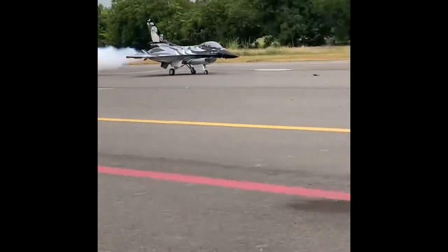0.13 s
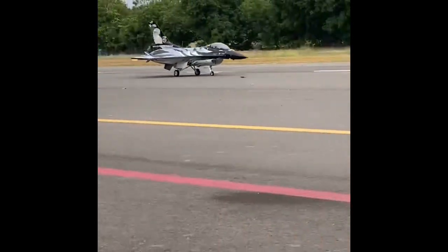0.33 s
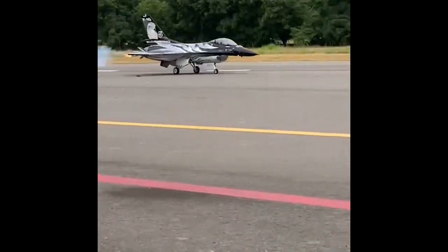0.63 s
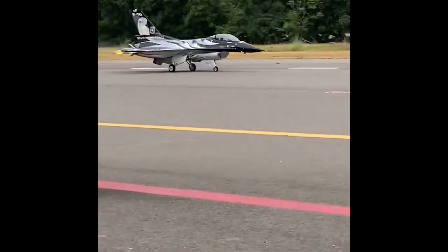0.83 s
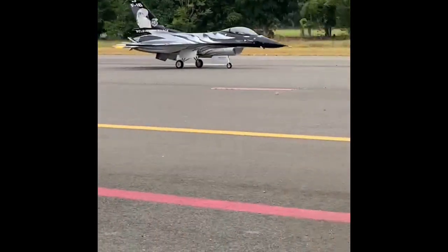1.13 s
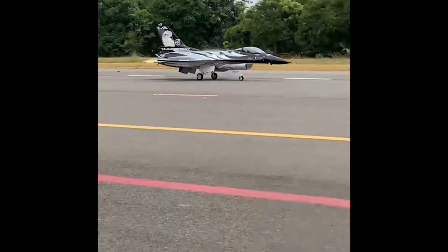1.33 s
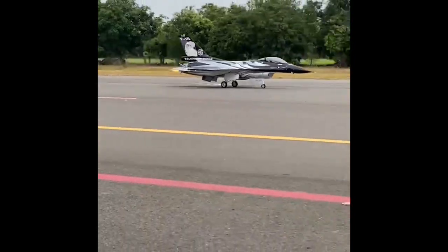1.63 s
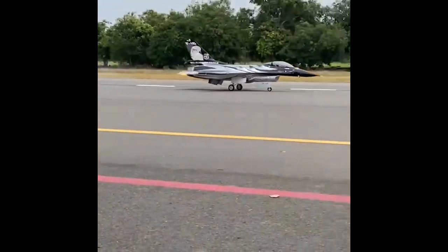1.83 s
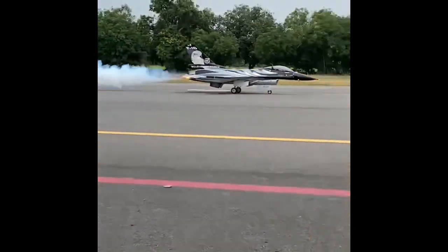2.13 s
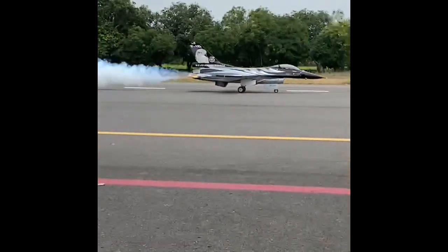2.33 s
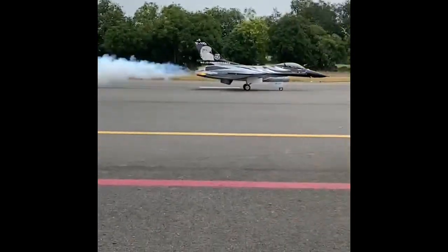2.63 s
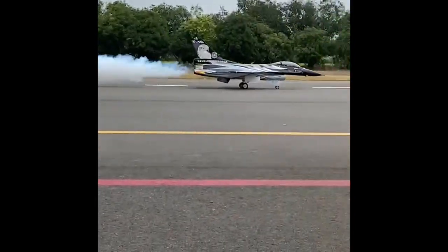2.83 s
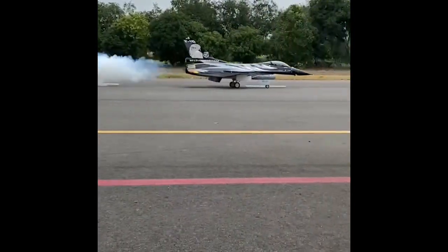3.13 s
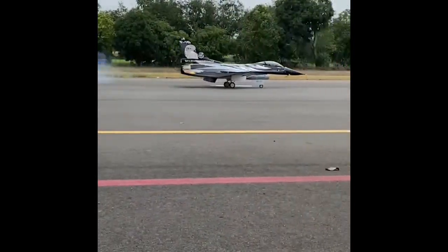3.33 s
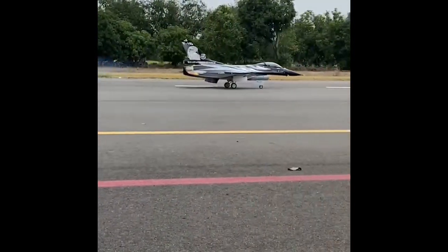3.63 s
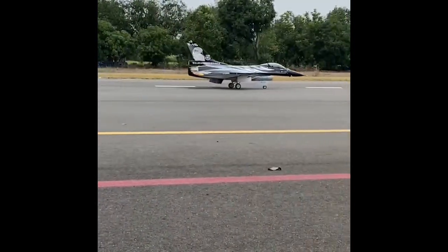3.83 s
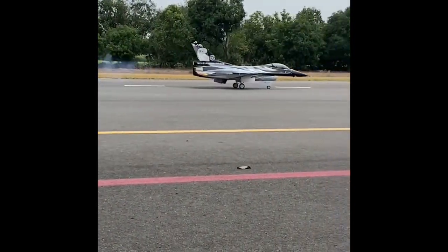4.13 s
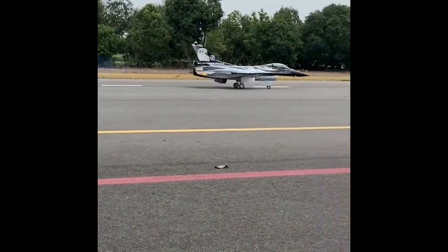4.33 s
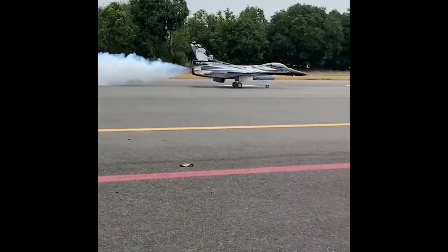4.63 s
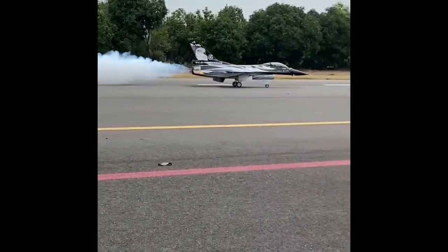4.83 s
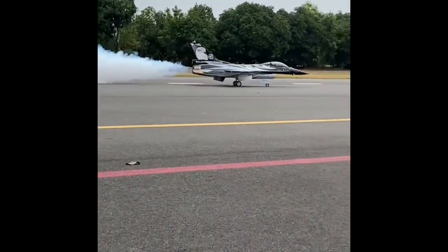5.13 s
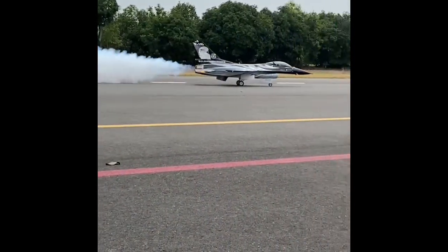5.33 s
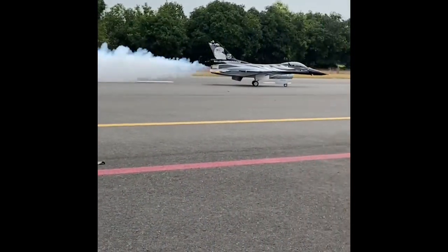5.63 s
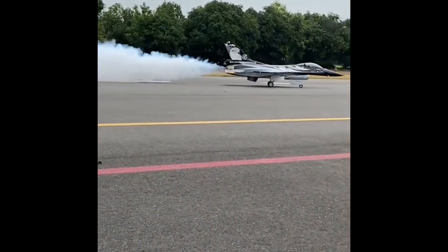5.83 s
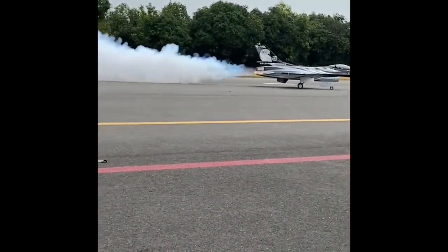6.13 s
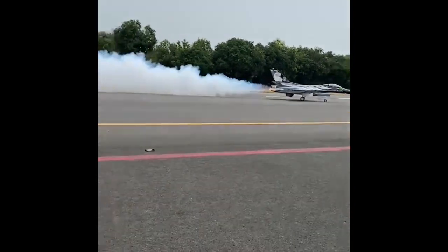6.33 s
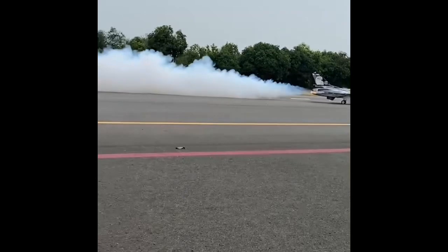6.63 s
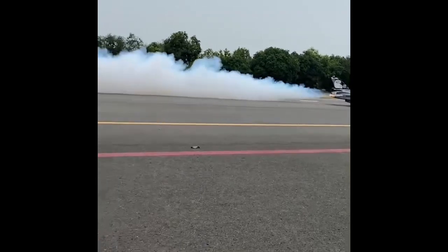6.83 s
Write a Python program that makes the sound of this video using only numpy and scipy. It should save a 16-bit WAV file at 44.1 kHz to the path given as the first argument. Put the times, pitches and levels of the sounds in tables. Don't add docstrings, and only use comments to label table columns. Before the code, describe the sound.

Shrill compressor whine wavers and drops out in quick fades while a miniature jet's tailpipe rumbles, swells and roars across an airfield runway.

```python
import sys
import numpy as np
from scipy import signal
from scipy.fft import rfft, irfft, next_fast_len
from scipy.io import wavfile
from scipy.ndimage import uniform_filter1d, map_coordinates

SR = 44100
rng = np.random.default_rng(int(sys.argv[2]) if len(sys.argv) > 2 else 0)


def volts_from_decibels(level):
    exponent = np.asarray(level, float) / 20
    return 10 ** exponent


def dump_mix(stems):
    frames = np.atleast_2d(stems).T
    limited = np.clip(frames, -1, 1)
    pcm = np.round(limited * 32767).astype(np.int16)
    wavfile.write(sys.argv[1], SR, pcm)


N = 308259


def along(points, hz):
    f, v = np.transpose(points)
    return np.interp(np.log(hz + 1), np.log(f + 1), v)


def curves(rows, t):
    s, *cols = np.transpose(rows)
    return [np.interp(t, s, c) for c in cols]


def unit(x):
    return x / np.sqrt(np.mean(np.abs(x) ** 2) + 1e-20)


def wobble(rate):
    return map_coordinates(rng.standard_normal(N // 100), [np.arange(N) * rate / SR])


def patches(shape, tall, long):
    field = uniform_filter1d(rng.standard_normal(shape), tall, 0)
    return unit(uniform_filter1d(field, long, 1))


def rush(colour, patchy_db, streak_db):
    hz, s, z = signal.stft(rng.standard_normal((2, N)), SR, nperseg=2048)
    gain = colour(hz[:, None], s) * np.ones(len(s))
    gain = gain / np.sqrt(np.mean(gain ** 2, axis=0))
    eddies = patchy_db * patches(gain.shape, tall=16, long=3)
    streaks = streak_db * patches(gain.shape, tall=3, long=35)
    return unit(signal.istft(z * gain * volts_from_decibels(eddies + streaks), SR, nperseg=2048)[1][:, :N])


def resonance(hz, centre_hz, width_hz):
    return hz * width_hz / np.hypot(centre_hz ** 2 - hz ** 2, hz * width_hz)


def glint_db(glints, hz, s):
    total_db = 0
    for at, half_s, centre, half_hz, db in glints:
        total_db = total_db + db * np.exp(-((hz - centre) / half_hz) ** 2) * np.exp(-((s - at) / half_s) ** 2)
    return total_db


def steady(x, span_s):
    power = uniform_filter1d(x[0] ** 2, round(span_s * SR))
    return x / np.sqrt(np.abs(power) + 1e-3)


# (time [s], blade passing rate [Hz])
BLADE_RATE = [(0.0, 4994.3), (0.411, 4795.1), (0.822, 4610.2), (1.234, 4451.1), (1.645, 4381.8),
              (2.056, 4423.5), (2.467, 4501.4), (2.878, 4600.9), (3.289, 4713.4), (3.701, 4779.2),
              (4.112, 4779.9), (4.523, 4731.1), (4.934, 4645.0), (5.345, 4548.3), (5.756, 4439.1),
              (6.168, 4429.5), (6.579, 4635.6), (6.99, 4910.2)]


def spool(t):
    s, hz = np.transpose(BLADE_RATE)
    return map_coordinates(hz, [np.interp(t, s, np.arange(len(s)))], mode="nearest")


# (time [s], level [dB])
THROTTLE = [(0, -30.5), (.2, -37), (.9, -33.5), (1.15, -35), (1.56, -30.5), (1.9, -27), (2.4, -25.5),
            (2.65, -26), (3.35, -25), (4.0, -27.5), (4.35, -26.5), (4.55, -29.5), (5.05, -31), (5.2, -29),
            (5.7, -29.5), (6.27, -22.5), (6.55, -21), (6.99, -23.5)]


def thrust_db(t):
    return curves(THROTTLE, t)[0]


def extra_thrust(t):
    return thrust_db(t) + 26.5


def turned(t):
    return np.clip(t / 1.84, 0, 1)


def law(t, base, thrust, turn, rev):
    cruise_hz = 4600
    return base + thrust * extra_thrust(t) + turn * turned(t) + rev * (spool(t) - cruise_hz) / 100


def halo(rate, db):
    return 1 + volts_from_decibels(db) * (wobble(rate) + 1j * wobble(rate))


# (time [s], level [dB])
WHINE_LEVEL = [(0, -21), (.45, -18.5), (.66, -20.5), (1.0, -17.5), (1.15, -28), (1.75, -29.5), (1.9, -24),
               (2.25, -31.5), (2.53, -22.5), (2.72, -30.5), (3.3, -19.5), (3.9, -18), (4.65, -18),
               (4.85, -26.5), (5.5, -27.5), (6.3, -23), (6.56, -18.5), (6.99, -12.5)]
# (time [s], half width [s], depth [dB])
WHINE_FADES = [(0.32, 0.05, -10), (.47, .04, -5), (1.14, .025, -12), (1.243, 0.013, -14), (1.43, 0.03, -6),
               (1.55, 0.03, -8), (1.78, 0.05, -7), (2.1, 0.035, -12), (2.313, 0.011, -8),
               (2.519, 0.017, -11), (2.599, 0.042, -13), (2.805, 0.029, -12), (2.909, 0.019, -15),
               (3.027, 0.014, -17), (3.401, 0.034, -13), (3.6, .05, -6), (3.68, 0.09, -16),
               (4.163, 0.04, -21), (4.494, 0.06, -16), (4.762, 0.045, -14), (4.889, 0.035, -24),
               (5.177, 0.023, -22), (5.32, 0.02, -15), (5.51, 0.03, -10), (5.95, 0.03, -7), (6.4, .04, -6),
               (6.64, 0.07, -13), (6.694, 0.03, -11), (6.789, 0.06, -18), (6.975, 0.06, -22)]


def compressor(t):
    spin = np.exp(2j * np.pi * np.cumsum(spool(t)) / SR)
    second_db = curves(WHINE_LEVEL, t)[0]
    third_db = law(t, base=-47, thrust=0, turn=-7.5, rev=-1.1)
    third_db = third_db + 2.5 * wobble(5.7) + 7 * np.clip((t - 6.35) / 0.28, 0, 1)
    paths = 1
    for s, half_s, depth_db in WHINE_FADES:
        paths = paths * (t - s + 1j * half_s * volts_from_decibels(depth_db)) / np.hypot(t - s, half_s)
    first = volts_from_decibels(-55 - 10 * turned(t)) * halo(30, -26) * spin
    second = volts_from_decibels(second_db) * paths * (halo(40, -7.5) + halo(480, -43) - 1) * spin ** 2
    third = volts_from_decibels(third_db) * halo(49, -13) * spin ** 3
    return np.sqrt(2) * (first + second + third).real


# (frequency [Hz], level per Hz [dB])
RUMBLE_COLOUR = [(15, -75.5), (30, -44), (42, -46.5), (55, -7), (100, -7), (150, 2), (190, -4),
                 (300, -14.5), (600, -92.5)]
# (time [s], deep rumble [dB], roar [dB], low swell [dB])
EXHAUST_AIM = [(0, 0, -1, -5), (.5, -5, 1, -4), (.9, -3, 0.5, 11), (1.3, -3, 0.5, 2.5),
               (1.8, -4.5, 0.5, -6), (2.3, 0, 2, -1), (2.8, 1.5, 2, 3.5), (3.2, 1.5, 1.5, 2),
               (3.6, 2.5, 1, -16), (4.0, 0, 1, -4), (4.5, -0.5, 0.5, -9), (5.0, 0.5, 1, -5),
               (5.5, -2.5, 1.5, -2), (5.9, -0.5, 2, 3), (6.2, -4, 2, 1.5), (6.5, 1, 2.5, -3.5),
               (6.75, -1, 0, 12), (6.99, 2.5, 0, 8)]
# (time [s], overtone gain [ratio], boom width [Hz])
TAILPIPE = [
    (0, 0.66, 85),
    (1.2, 0.03, 77),
    (2.6, 1.77, 64.7),
    (3.6, 1.43, 75),
    (5, 1.2, 66.7),
    (6.1, 0.89, 97),
    (6.99, 1.1, 92.3),
]
# (time [s], half width [s], centre [Hz],
# half width [Hz], level [dB])
LOW_GLINTS = [(.5, 0.8, 173, 23, -5), (.6, .7, 334, 30, -6.5), (.7, 0.55, 281, 11, 3.5),
              (3.6, 0.77, 876, 70, -3.5), (3.1, .7, 1800, 88, -1.5), (3.1, .15, 283, 32, -1.5),
              (4.14, .15, 399, 60, -2.5), (1.38, 0.38, 365, 60, 6), (1.56, 0.3, 532, 70, -6.5),
              (3.2, 0.24, 558, 80, -6), (5.5, 0.66, 464, 50, -2), (5.7, .5, 950, 70, -2.5),
              (6.59, 0.34, 618, 50, 9.5), (6.85, 0.29, 150, 25, 1.5), (6.9, 0.22, 560, 60, 4.5),
              (5.5, 0.36, 1000, 45, 4), (6.1, 0.26, 1070, 50, 3), (.5, .6, 1110, 80, 4.5),
              (.5, .6, 1480, 60, -3), (6.7, 0.32, 810, 55, 4), (2.1, 0.27, 920, 140, 2)]


def rumble(t, surge):
    def colour(hz, s):
        opening = curves(TAILPIPE, s)[0] - 1.4 - 0.16 * np.maximum(extra_thrust(s), 0)
        lift_db = 2.6 * opening * np.log2(hz / 100 + .01)
        swell_db = curves(EXHAUST_AIM, s)[2] / (1 + (hz / 68) ** 8)
        return volts_from_decibels(along(RUMBLE_COLOUR, hz) + lift_db + swell_db + glint_db(LOW_GLINTS, hz, s))

    level_db = law(t, base=-39, thrust=0.67, turn=8.5, rev=0) + curves(EXHAUST_AIM, t)[0]
    noise = steady(rush(colour, patchy_db=-1, streak_db=1.7), span_s=.17)
    return volts_from_decibels(level_db + 0.5 + 0.25 * surge) * noise


# (time [s], tailpipe [Hz], airframe duct [Hz])
DUCT_TUNING = [(0, 256, 1392), (.9, 256, 1475), (1.25, 263.3, 828), (1.9, 237.7, 820), (2.3, 218, 837),
               (2.7, 207, 980), (3.3, 201, 940), (4.1, 212, 1020), (4.7, 197, 935), (5.2, 204, 990),
               (5.7, 201, 1013), (6.3, 201, 1090), (6.5, 203, 800), (6.99, 194, 843)]
# (time [s], half width [s], level [dB])
BOOM_SURGES = [(1.99, 0.22, 3.5), (2.07, 0.045, -9.5), (2.49, 0.069, -6), (2.63, 0.022, 7.5),
               (2.76, 0.22, 0.5), (4.48, 0.021, -9), (5.08, 0.043, -4.5), (5.94, 0.021, 5),
               (5.99, 0.066, -2.5), (6.85, 0.015, -17), (6.91, 0.065, 3)]


def boom(t, surge):
    def colour(hz, s):
        ring = resonance(hz, curves(DUCT_TUNING, s)[0], curves(TAILPIPE, s)[1])
        return ring ** 3 * volts_from_decibels(glint_db(LOW_GLINTS, hz, s))

    level_db = thrust_db(t)
    for s, half_s, db in BOOM_SURGES:
        level_db = level_db + db * np.exp(-((t - s) / half_s) ** 2)
    noise = steady(rush(colour, patchy_db=0.5, streak_db=4.5), span_s=.11)
    return volts_from_decibels(level_db + 0.1 + 0.25 * surge) * noise


# (frequency [Hz], level per Hz [dB])
ROAR_COLOUR = [(200, -64.5), (280, 3.5), (340, -6.5), (430, -1.5), (500, -8), (610, -6), (720, -7.5),
               (900, -12), (1300, -13), (1500, -15), (1800, -12.5), (2000, -16), (2300, -21.5),
               (6000, -44.5)]


def roar(t, surge):
    def colour(hz, s):
        overtone = curves(TAILPIPE, s)[0] * resonance(hz, centre_hz=367.7, width_hz=44) ** 2
        duct = 1 + 1.5 * resonance(hz, curves(DUCT_TUNING, s)[1], width_hz=90) ** 2 + overtone
        db_per_octave = law(s, base=-3.5, thrust=-0.266, turn=3.5, rev=0.55)
        tilt_db = db_per_octave * np.log2(hz / 700 + .01)
        return volts_from_decibels(along(ROAR_COLOUR, hz) + glint_db(LOW_GLINTS, hz, s) + tilt_db) * duct

    level_db = law(t, base=-38, thrust=0.535, turn=6.5, rev=0.83) + curves(EXHAUST_AIM, t)[1]
    return volts_from_decibels(level_db + 0.65 + 0.4 * surge) * rush(colour, patchy_db=.5, streak_db=2.5)


def exhaust(t):
    surge = wobble(8.3)
    return rumble(t, surge) + boom(t, surge) + roar(t, surge)


# (frequency [Hz], level per Hz [dB])
HISS_COLOUR = [(1200, -71), (2200, -1), (2800, 1.5), (4000, -1.5), (5000, 0), (5700, -1.5), (6700, 3),
               (7700, 2), (8500, 2), (10000, 4), (11500, -9), (12600, -8.5), (14500, -6.5), (15600, -23)]
# (time [s], half width [s], centre [Hz], half width [Hz], level [dB])
HISS_ECHO = [(.6, 0.38, 3430, 910, 4), (.6, 0.7, 6880, 500, 2), (.5, 0.44, 5100, 203, 7.5),
             (1.8, 0.61, 3500, 690, -5.5), (3.3, 0.52, 5160, 197, 3), (3.7, 0.94, 3770, 685, 3),
             (5.4, 0.32, 6460, 1160, -5), (6.6, 0.6, 6200, 398, 1.5), (6.3, 0.39, 4370, 150, 3),
             (6.5, 0.95, 3220, 250, -6.5), (6.75, 0.63, 5300, 250, 1.5)]


def intake(t):
    def colour(hz, s):
        db_per_octave = law(s, base=2.3, thrust=0.017, turn=-0.043, rev=0.35)
        sheen_db = law(s, base=0.96, thrust=-0.15, turn=-1.8, rev=-0.96) / (1 + (11500 / (hz + 1)) ** 12)
        tilt_db = db_per_octave * np.log2(hz / 5000 + .01)
        return volts_from_decibels(along(HISS_COLOUR, hz) + tilt_db + sheen_db + glint_db(HISS_ECHO, hz, s))

    level_db = law(t, base=-36, thrust=0.4, turn=-3.5, rev=0.42) + 4.5 + 0.21 * wobble(11)
    return volts_from_decibels(level_db) * rush(colour, patchy_db=1.35, streak_db=2.5)


# time [s], peak [dB], pitch [Hz], decay by 60 dB [s]
SEAM_BUMP = (1.013, -17, 130, .055)


def wheel(t):
    at, peak_db, hz, t60 = SEAM_BUMP
    u = np.maximum(t - at, 0)
    decay = volts_from_decibels(peak_db - 60 * u / t60)
    onset = 1 - np.exp(-u / 0.0042)
    return 1.6 * decay * onset * np.sin(2 * np.pi * hz * u)


# (frequency [Hz], phase [rad])
PORT_LEAD = [(1900, 0), (2650, .65), (3600, .08), (4300, .5), (4700, 1.4), (5050, 2.7), (5350, 1.6),
             (5700, 1.45), (7000, 2.45), (8800, 2.86), (9550, 3.075), (10000, 3.28), (13250, 4.26),
             (15000, 5.05)]
# (frequency [Hz], level [dB])
PORT_TILT = [(60, 0.0), (99, 0.0), (160, 0.5), (270, 0.5), (450, 1.5), (740, 4.5), (1220, 4.0), (2010, 0.0),
             (3330, 0.0), (5500, 0.0), (9080, 0.0), (15000, 0.0)]
# (frequency [Hz], level [dB])
PORT_APART = [(60, -38), (300, -28), (1000, -19), (1900, -27), (2700, -13), (3600, -16), (4500, -9),
              (5050, -15), (6500, -12), (9000, -18), (13000, -9), (15500, -6)]


def ports(shared, own):
    m = next_fast_len(N + 8192)
    hz = np.fft.rfftfreq(m, 1 / SR)
    half = volts_from_decibels(along(PORT_TILT, hz) / 2) * np.exp(.5j * along(PORT_LEAD, hz))
    common = rfft(shared, m)
    apart = rfft(own, m) * volts_from_decibels(along(PORT_APART, hz))
    return irfft([(common + apart) * half, (common - apart) / half], m)[:, :N]


def scene():
    t = np.arange(N) / SR
    whine = compressor(t)
    air = exhaust(t) + intake(t)
    return ports(air[0] + whine + wheel(t), air[1])


def spans_db(spans, s):
    return sum(db * (s > a) * (s < b) for a, b, db in spans)


def inside(spans, s):
    return sum((s > a + .008) * (s < b - .008) for a, b in spans) > 0


# (frequency [Hz], margin [dB])
MASK_MARGIN = [(7000, -49.5), (7240, -35), (7920, -31.5), (8600, -27), (10200, -25), (11400, -29),
               (12100, -28.5), (13500, -32.5), (15000, -36), (15600, -39)]
# (from [s], to [s], threshold [dB])
TREBLE_THINNING = [(-1, .05, -3), (.09, .29, 9), (.33, .39, 8), (.54, .69, 9), (.87, .9, 4),
                   (1.39, 1.56, 6.5), (1.62, 1.65, 5), (2, 2.03, 5), (1.78, 1.82, 9), (2.12, 2.18, 9),
                   (2.29, 2.32, -8), (2.35, 2.39, 7), (2.49, 2.53, -3), (2.6, 2.7, 9), (2.74, 2.82, 4),
                   (2.88, 2.95, 5), (3.57, 3.8, 3), (2.6, 3.8, 3.5), (3.2, 3.24, 7), (3.27, 3.33, 7),
                   (3.41, 3.52, 7), (3.8, 4.1, 9), (4.12, 4.16, -14), (4.18, 4.45, 9), (4.53, 4.71, 9),
                   (4.79, 4.82, -3), (5.39, 5.43, -3), (5.65, 5.68, -3), (4.84, 4.88, 7), (4.97, 5, -12),
                   (5.02, 5.14, 8), (5.3, 5.36, 3), (5.36, 5.39, 7), (5.43, 5.46, 7), (6.28, 6.36, -12),
                   (6.44, 6.52, 10), (6.52, 6.58, 6.5), (6.6, 6.69, 3), (6.69, 6.74, 9), (6.8, 6.95, 9),
                   (6.96, 7, -12)]
# (from [s], to [s], threshold [dB])
EDGE_THINNING = [(0, .07, -6), (.28, .44, -5), (1.04, 1.11, -6), (1.12, 1.68, 2), (1.69, 2.25, 5),
                 (2.25, 2.32, -6), (2.42, 2.53, -5), (2.66, 2.94, 4), (3.11, 3.58, -6), (3.58, 5.5, -2),
                 (3.78, 3.87, -4), (3.99, 4.41, -3), (5.22, 5.32, -4), (5.63, 6.33, 4), (6.33, 6.43, -5),
                 (6.59, 6.64, -6), (6.7, 7, -6)]
# (from [s], to [s])
WHINE_HELD = [(-1, .06), (.39, .48), (.5, .56), (.68, 2.075), (2.085, 2.515), (2.525, 2.68), (2.69, 2.735),
              (2.745, 2.81), (2.82, 2.87), (2.97, 3.02), (3.08, 3.23), (3.34, 3.39), (3.59, 3.63),
              (4.18, 4.23), (4.55, 4.6), (4.66, 4.72), (4.78, 4.81), (4.84, 4.88), (4.92, 5.02),
              (5.13, 5.16), (5.18, 5.29), (5.33, 5.51), (5.54, 6.43), (6.51, 6.58), (6.72, 6.79), (6.96, 8)]
# (frequency [Hz], level [dB])
SUM_FLOOR = [(4200, -30), (4700, -10), (4900, -11), (5100, -14), (5500, -5), (6000, -6), (7000, -9),
             (8300, -11), (8400, -90)]
# (frequency [Hz], level [dB])
DIFF_FLOOR = [(1200, -50), (1500, -18), (2600, -14), (3700, -14), (4300, -13), (4800, -50)]


def masked_treble(x):
    frame, lag = 1024, 626
    near_hz, far_hz = 8300, 12000
    pair = np.pad([x[0] + x[1], x[0] - x[1]], [(0, 0), (lag, 0)]) / 2
    hz, s, z = signal.stft(pair, SR, window="cosine", nperseg=2 * frame)
    s = s - lag / SR
    power = np.abs(z[:, :frame]) ** 2
    grouped = power.reshape(2, 32, 32, -1)
    bands = grouped.sum(axis=2)
    tonal = grouped.max(axis=2) > .26 * bands
    centre = hz[16:frame:32, None]
    treble = centre > near_hz

    whine = bands[:, treble[:, 0]].max(axis=(0, 1))
    whine = uniform_filter1d(whine, size=3)
    boom_power = volts_from_decibels(-9) ** 2 * bands[0, 0]

    lean_db = spans_db(TREBLE_THINNING, s) * treble
    lean_db = lean_db + spans_db(EDGE_THINNING, s) * (centre < near_hz)
    spared = (whine < .9 * np.median(whine)) & treble & (centre < 13400) & (lean_db > 0)
    lean_db = np.array([lean_db, lean_db * np.where(spared, .3, 1)])
    masked = treble & (centre < far_hz) & (lean_db[0] >= 0)
    sparse = (lean_db > 6) | np.array([masked, 0 * masked], bool)
    far_tone = sparse & tonal & (centre > far_hz)
    lean_db = lean_db * ~far_tone

    masker = np.where(centre < far_hz, 1, volts_from_decibels(-8) ** 2) * whine + boom_power
    masker = np.where(centre < near_hz, np.median(whine + boom_power), masker)
    chance_db = 1.5 * rng.standard_normal(len(s)) + 3.2 * rng.standard_normal(bands.shape)
    keep = bands > volts_from_decibels(along(MASK_MARGIN, centre)) ** 2 * masker * volts_from_decibels(lean_db + chance_db) ** 2
    held = tonal[0] & (bands[1] > whine / 12) & inside(WHINE_HELD, s)
    keep[0] = np.where(masked, held, keep[0])
    keep |= far_tone

    thin = power.reshape(2, 128, 8, -1).sum(axis=2)
    thin = uniform_filter1d(thin, size=2)
    thin_hz = hz[4:frame:8]
    gap_db = np.array([along(SUM_FLOOR, thin_hz), along(DIFF_FLOOR, thin_hz)])
    gap_db = gap_db[..., None] + 2.5 * patches(thin.shape[1:], tall=2, long=3)
    z[:, :frame] *= np.repeat(thin > volts_from_decibels(gap_db) ** 2 * thin[::-1], 8, axis=1)

    def wide(v):
        return np.repeat(v, 32, axis=-2)

    peaks = power > .07 * wide(bands)
    z[:, :frame] *= wide(keep) & (~wide(sparse) | peaks)
    mid, side = signal.istft(z, SR, window="cosine", nperseg=2 * frame)[1][:, lag:lag + N]
    return np.array([mid + side, mid - side])


def top_cut(x):
    return signal.sosfilt(signal.butter(12, 15680, fs=SR, output="sos"), x)


def record(dry):
    mix = masked_treble(dry)
    return top_cut(mix)


dry = scene()
out = record(dry)
dump_mix(out)
```